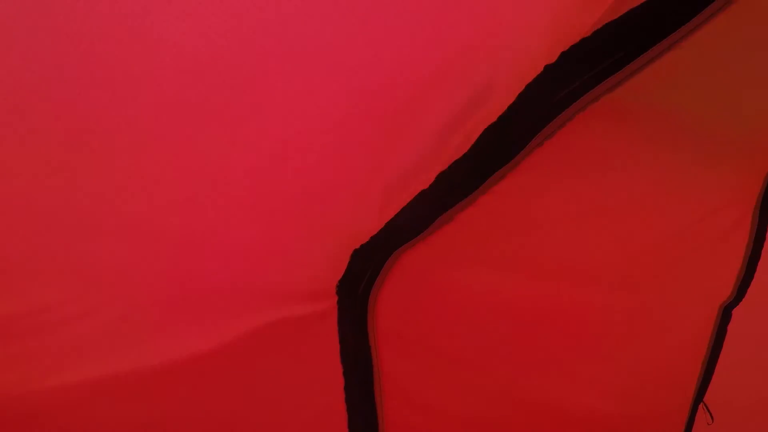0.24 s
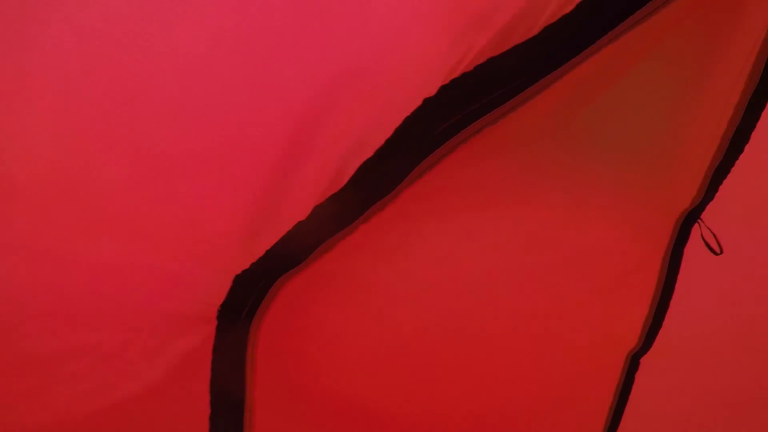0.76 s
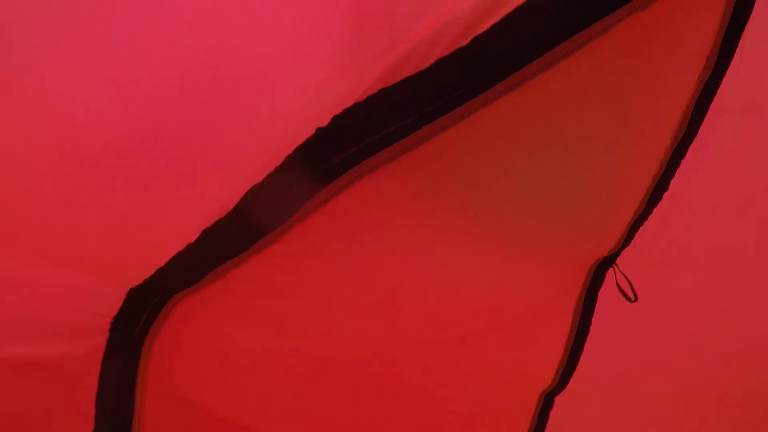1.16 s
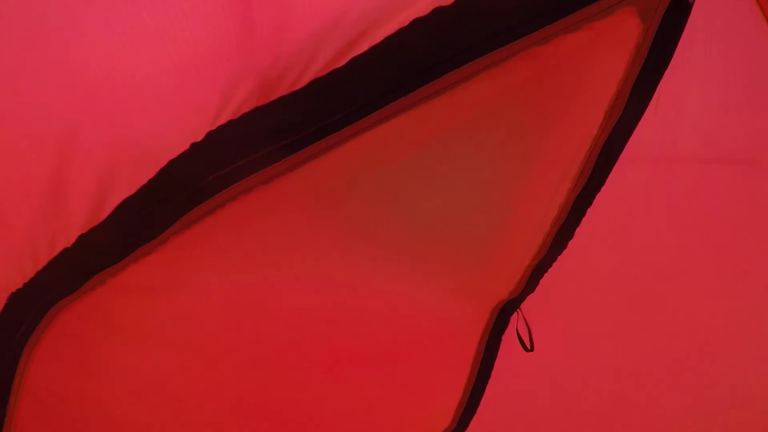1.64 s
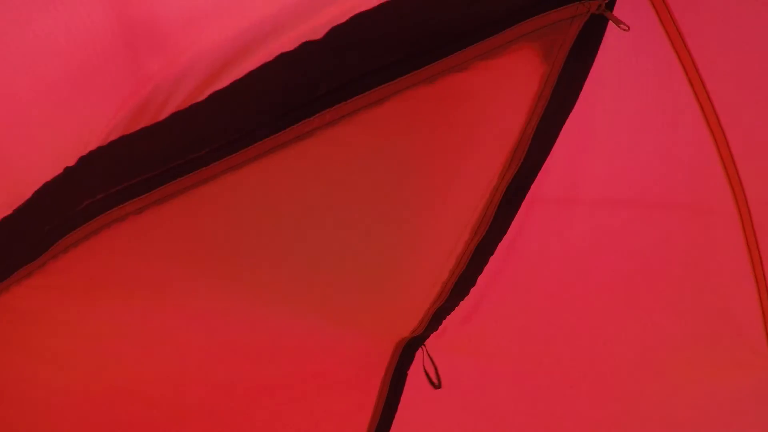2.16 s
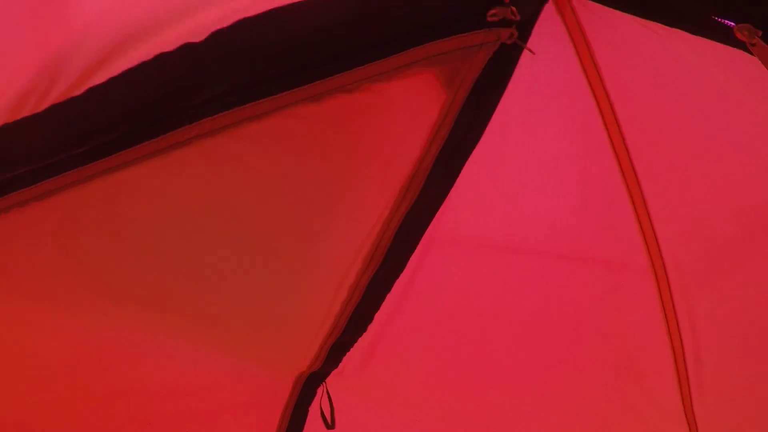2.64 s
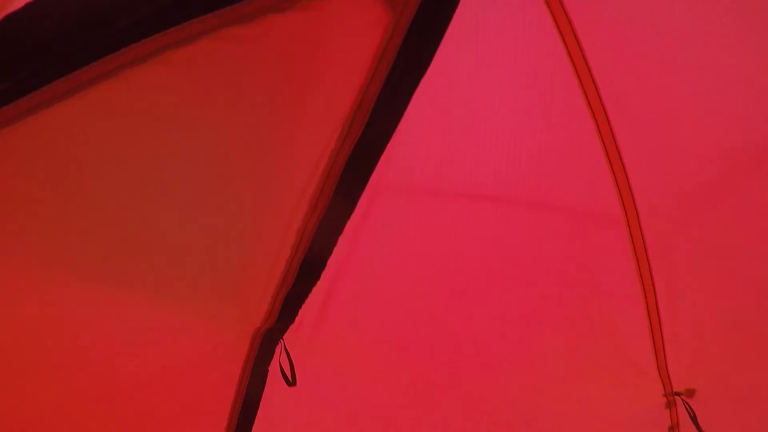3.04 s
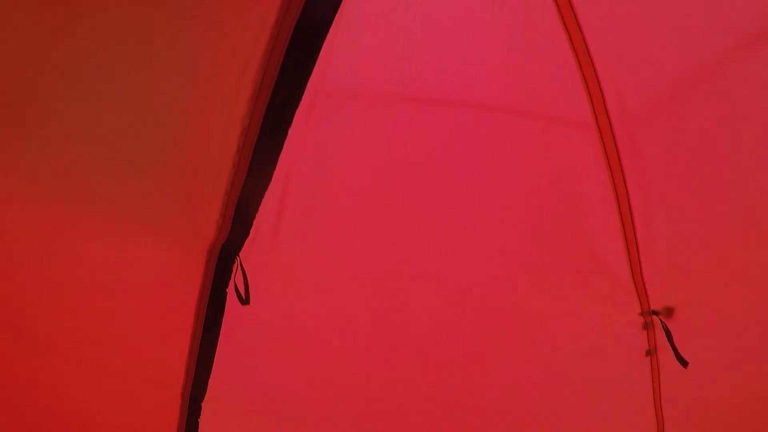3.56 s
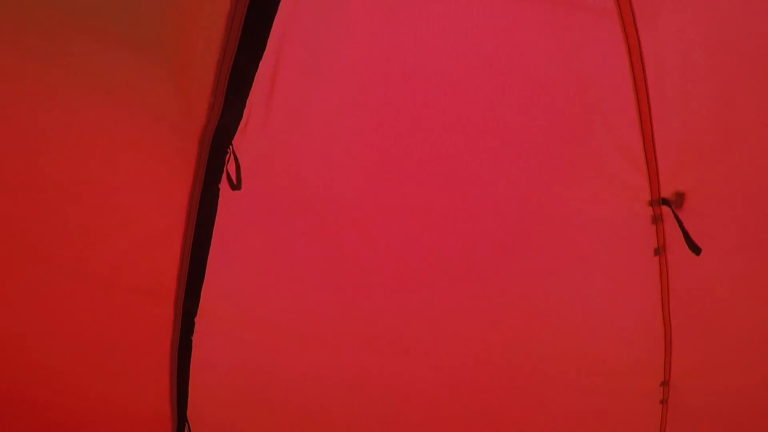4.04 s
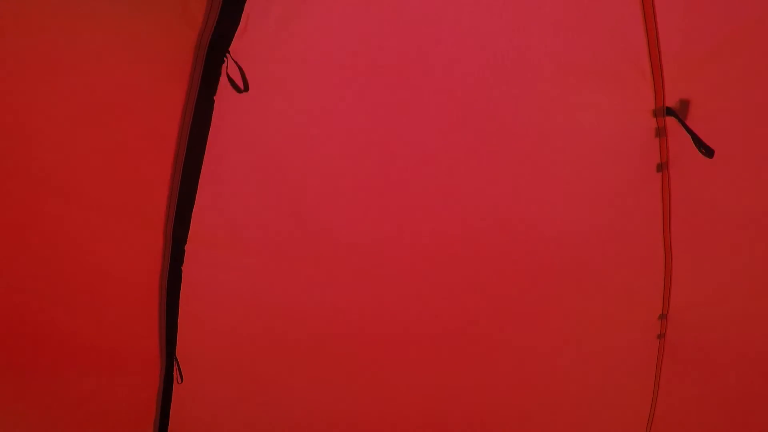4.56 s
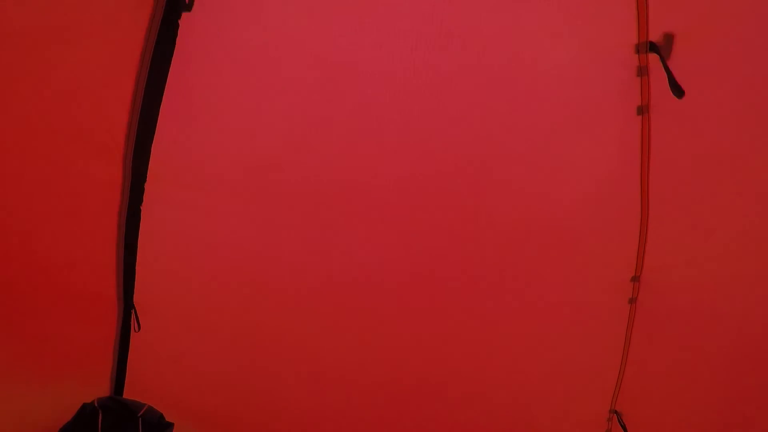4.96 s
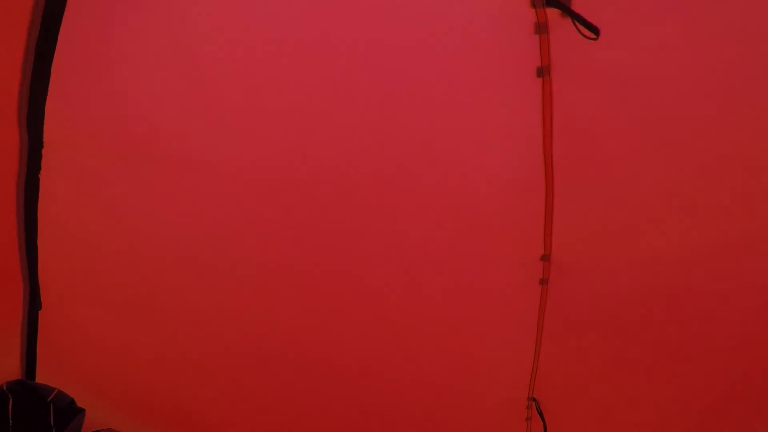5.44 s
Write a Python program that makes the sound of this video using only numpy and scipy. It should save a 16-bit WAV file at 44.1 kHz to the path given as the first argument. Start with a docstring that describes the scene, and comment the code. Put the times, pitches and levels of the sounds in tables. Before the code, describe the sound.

A close, dry mono sound from inside a tent in a storm. Very deep wind pressure, mostly below 100 Hz, pumps the walls in irregular lumps throughout, far louder than the muffled roar and fine fabric hiss above it. The first second is the windiest, with crisp cloth snaps at about 0.1 and 0.5 s and dull knocks at 0.2, 0.3, 0.5 and 0.65. A strong buffet and a knock come around 1.35 s. From 1.5 to 2.8 s the wind is somewhat lower, with scattered rustles and a knock at 2.15. Gusts swell near 3.05; a tight, bright cluster of slaps hits at 3.55. It eases around 4.1 to 4.6, with tiny zip-pull tinkles near 4.25 to 4.4. The pressure surges at 4.97, a heavy hard flap strikes at 5.16, and the biggest bass buffet, overloading, comes at 5.3. Crackling flaps follow at 5.5 to 5.6, and it stops mid-wind. Faint high metallic ticks recur throughout.

```python
"""Inside a tent in a storm. Gusts pump the walls with deep pressure lumps, roar over the fly sheet and hiss along it:
filtered noise under slow gain curves. The cloth rustles, snaps taut in bursts of crackle and knocks in short
damped swings; two small metal zip pulls jingle as sums of decaying modes. The loudest peaks overload the microphone."""
import sys
import numpy as np
from scipy import signal
from scipy.fft import rfft, irfft, next_fast_len
from scipy.io import wavfile
from scipy.ndimage import uniform_filter1d, map_coordinates

SR = 44100
rng = np.random.default_rng(int(sys.argv[2]) if len(sys.argv) > 2 else 0)


def master_out(mix):
    """Clip the mix to full scale and print it as 16-bit PCM to the path in sys.argv[1]."""
    frames = np.transpose(np.atleast_2d(mix))
    ceiling = np.clip(frames, -1, 1)
    pcm = np.round(ceiling * 32767).astype(np.int16)
    wavfile.write(sys.argv[1], SR, pcm)


N = 250929

# Pumping of the walls by gusts: t/s, nominal level/dB
WALL_LUMPS = [(0.0, -8), (0.4, -8), (0.7, -8.5), (0.74, -10.5), (0.95, -9.5), (1.17, -9.5), (1.25, -16.5),
              (1.37, -5.5), (1.54, -15.5), (1.6, -8.5), (1.68, -22), (1.73, -11.5), (1.9, -10.5),
              (2.15, -12.5), (2.22, -19.5), (2.42, -12.5), (2.83, -13), (3.05, -7), (3.28, -12),
              (3.6, -11.5), (3.76, -16), (3.81, -9), (4.06, -23), (4.1, -13.5), (4.6, -16), (4.89, -13),
              (4.97, -7), (5.02, -19), (5.24, -14), (5.32, 0), (5.6, -16.5), (5.66, -8)]
# Wind along the fly sheet: t/s, nominal roar level/dB, nominal fine hiss level/dB
WIND_LEVELS = [(0.04, -19, -49.5), (0.2, -23, -49), (0.5, -18.5, -45.5), (0.7, -23, -48.5), (0.9, -25, -51),
               (1.13, -27.5, -53), (1.48, -27.5, -60.5), (1.73, -29.5, -53.5), (1.88, -26.5, -50),
               (2.25, -27.5, -52.5), (2.45, -22, -48.5), (2.68, -29, -55), (2.9, -23, -51),
               (3.05, -24, -47), (3.5, -24.5, -53), (3.75, -26, -53), (4.05, -29, -53.5),
               (4.25, -28.5, -53.5), (4.55, -29.5, -56), (4.81, -25.5, -52.5), (5.21, -27, -48),
               (5.38, -24, -48), (5.66, -27.5, -52.5)]
# Relative spectral densities of the four layers of air noise: f/Hz, level/dB
PUMP_SPECTRUM = [(7.1, -62), (12, 2), (27, 1), (42, 0), (68, -4), (136, -19), (200, -24.5), (260, -27),
                 (440, -120)]
ROAR_SPECTRUM = [(59, -58), (100, -3.5), (420, -15), (755, -17), (1110, -21.5), (1450, -26), (1840, -39),
                 (2400, -40.5), (3120, -64), (5280, -120)]
HISS_SPECTRUM = [(880, -15), (1500, -10), (1740, -5), (2250, -13.5), (2790, -5.5), (4230, -11.5),
                 (4970, -6.5), (6600, -24.5), (7500, -22), (9750, -34), (16500, -120)]
FINE_SPECTRUM = [(3530, -33), (6000, -2), (6840, -9.5), (9480, -8), (10900, -12.5), (14400, -11.5),
                 (15500, -17)]
# Cloth snapping taut: peak t/s, slap level/dB, crispness level/dB re slap, e-fold rise time/s, nominal t60/s
CLOTH_SNAPS = [(0.113, -25.5, -8.5, 0.0023, 0.12), (0.298, -46, -2, .01, .03),
               (0.406, -29, -26, .0045, .037), (0.466, -29, -8, .0024, .06),
               (0.49, -21.5, -8, 0.0025, 0.08), (0.788, -27.5, -8.5, 0.0044, .035),
               (0.895, -34.5, -19, .003, .023), (1.17, -44, -4, .017, .08), (1.497, -35, -12, .002, 0.017),
               (1.656, -41, -7, .003, .13), (1.688, -39, -14, .008, .054), (1.769, -33.5, -8, .003, 0.13),
               (1.944, -31.5, -9, .003, 0.038), (2.301, -32, -26, .001, 0.062),
               (2.458, -28, -26, 0.0022, 0.07), (2.661, -31.5, -8, 0.0072, 0.057),
               (2.802, -35.5, -36, .001, 0.025), (2.904, -32, -12, .003, .063),
               (2.94, -35, -8, 0.0059, .127), (3.007, -27, -30, 0.0038, .03),
               (3.044, -35.5, -12, .003, .09), (3.163, -30.5, -7.5, .007, 0.055),
               (3.331, -35, -14, .003, .024), (3.404, -38.5, -2, .003, .08),
               (3.448, -34.5, -3.5, .004, 0.075), (3.564, -28.5, -4, .001, 0.11),
               (3.569, -27, -18, 0.011, .04), (3.684, -38.5, -22, .007, 0.13), (3.731, -34, -9, .005, .046),
               (3.923, -28, -4, .0027, 0.052), (4.084, -38, -14, .004, .12),
               (4.166, -32.5, -26, .003, .023), (4.231, -30.5, -8.5, 0.012, 0.13),
               (4.645, -31.5, -7, 0.0039, 0.035), (4.667, -30.5, -20, .004, .02),
               (4.774, -36, -21, .0024, .023), (4.941, -28, -9, 0.013, 0.033), (5.109, -42, -8, .006, .054),
               (5.166, -23.5, -7.5, .0023, 0.055), (5.266, -28, -24, 0.014, 0.064),
               (5.371, -35.5, -12, .025, 0.15), (5.528, -28.5, -9.5, .012, 0.058),
               (5.56, -25.5, -21, .0075, .04), (5.586, -36.5, -9, .02, .067)]
# Relative spectral densities of the three parts of a snap: f/Hz, level/dB
THUD_SPECTRUM = [(100, -34), (250, -1), (900, -10.5), (1500, -11), (2400, -44)]
SLAP_SPECTRUM = [(1200, -38), (2000, 8.5), (3500, 5), (5000, 6.5), (6000, 1.5), (8000, -34)]
CRISP_SPECTRUM = [(5000, -25), (7000, -2), (8500, 0), (11000, -7), (15500, -12)]
# Blows of slack cloth on pole or inner wall, and one short sharp click at 3.549 s: t/s, nominal peak level/dB,
# starting f/Hz, # decay to -60 dB [swings at the starting f]
CLOTH_KNOCKS = [(0.204, -11, 520, 18), (.2805, -11, 950, 19), (0.489, -12.5, 1480, 25),
                (.640, -13, 710, 14), (1.3372, -10.5, 1150, 12.5), (1.343, -15.5, 960, 28),
                (2.149, -15, 1195, 15), (3.5488, -8, 2600, 5.5), (3.5665, -9.5, 1350, 11),
                (3.5705, -11.5, 1160, 29), (3.920, -19, 1185, 36), (4.031, -23, 760, 13),
                (4.804, -13, 700, 12), (5.1628, 2.5, 464, 4), (5.163, -5.5, 1500, 8),
                (5.1661, -6.5, 245, 10), (5.525, -15, 614, 10)]
# Contacts of the long zip pull: nominal t/s, free ringing time/s, nominal level/dB, favoured mode [0-2, may be fractional]
LONG_PULL_CONTACTS = [(0.012, 0.029, -52, 1), (0.147, .01, -44, 0), (0.16, .032, -45, 1),
                      (0.171, .015, -46, 0.078), (0.241, .015, -48, .1), (0.321, .02, -45, 0.13),
                      (0.335, .028, -46, 1), (0.376, .025, -48, 1), (0.455, .03, -38, .9),
                      (0.467, .012, -44, 0), (0.504, .065, -34, 0.52), (0.545, .015, -40, 0),
                      (0.576, .015, -43, 0.18), (0.594, .012, -43, 0.11), (0.58, .075, -45, 1),
                      (0.84, .02, -39, .2), (0.86, .03, -40, 0.21), (0.905, .04, -50, 1),
                      (1.149, .08, -47, 1), (1.384, .03, -47, 1), (1.414, .018, -42, 1.4),
                      (1.454, .062, -41.5, 0.27), (1.536, .022, -39, 0.6), (1.835, .032, -36, 1.8),
                      (1.868, .03, -36, 2), (1.975, .062, -39.5, 1.25), (2.16, 0.045, -44, 1),
                      (2.203, .055, -44, 1), (2.539, .052, -40, 0.57), (2.985, .015, -50, .2),
                      (3.404, 0.094, -40, 1.3), (3.497, .022, -34, 1.8), (3.517, .025, -47, 0),
                      (3.651, .067, -45, 1.5), (4.382, .025, -48, 2), (4.412, .07, -45.5, 1),
                      (4.504, .017, -55, 0), (4.761, .047, -53, .2), (4.809, .012, -41, .6),
                      (4.868, .027, -47, 0), (4.878, .015, -40, 2), (4.978, .03, -49, 1),
                      (4.896, 0.034, -39, 1.6), (5.327, .02, -49, 2), (5.367, .062, -41, 2),
                      (5.452, .032, -46, 1.7), (5.509, .015, -43, 1), (5.552, .03, -48, 0)]
# Contacts of the short zip pull: nominal t/s, nominal level/dB, favoured mode [0-1, may be fractional]
SHORT_PULL_CONTACTS = [(0.147, -58, 1), (2.938, -46, .6), (3.374, -48, .6), (4.237, -33, .2),
                       (4.295, -37, .3), (4.359, -39, 0), (4.38, -45, 0), (4.896, -52, .1), (5.075, -50, 1),
                       (5.09, -45, .2), (5.125, -43, .3), (5.312, -47, .4), (5.652, -34, 0.06)]
# Modes of either pull: mean f/Hz, relative level/dB, free t60/s, standard deviation of f [share of f]
LONG_PULL_MODES = [(7440, 0, 0.064, 0.0043), (9200, -8, 0.46, 0.0012), (11430, -10, 0.2, .0015)]
SHORT_PULL_MODES = [(5960, -0.5, 0.027, .006), (14250, -7, .06, .004)]
# Relative spectral density of the tick of metal contact: f/Hz, level/dB
TICK_SPECTRUM = [(5500, -30), (7000, 6), (9500, -4), (12500, -13), (15500, -20)]

LUMP_KNOTS_PER_S, LUMP_SWING_DB = 14, 1.5  # uneven buffets: rate and depth
# mean nominal hiss level; shares of the roar's and fine hiss's level swings that it follows
HISS_MEAN_DB, HISS_FROM_ROAR, HISS_FROM_FINE = -41.5, .3, 0.33
THUD_RE_SLAP_DB = 6
MODE_FALL_DB = 15  # loss per mode away from the favoured one
LIGHT_MIN_DB, LIGHT_MEAN_FREE_S = -54.5, .025  # light random touches of the long pull
TOP_HZ = 15300  # upper band limit


def pumping():
    """Wall displacement by turbulent pressure: low-band noise, saturating as the cloth tension rises."""
    level_db = curves(WALL_LUMPS)[0] + LUMP_SWING_DB * wobble(LUMP_KNOTS_PER_S)
    swing = amp(level_db) * rush(PUMP_SPECTRUM, patchy_db=-0.04)
    # the taut walls resist the largest swings
    return swing / (1 + (swing / .95) ** 4) ** (1 / 4)


def wind():
    """Broadband turbulence noise in three bands, amplitude-modulated by flutter and small folds of cloth."""
    roar_db, fine_db = curves(WIND_LEVELS)
    roar_swing_db, fine_swing_db = roar_db - roar_db.mean(), fine_db - fine_db.mean()
    hiss_db = HISS_MEAN_DB + HISS_FROM_ROAR * roar_swing_db + HISS_FROM_FINE * fine_swing_db
    flutter = wobble(13)
    wide = rustle(count=170, spread_db=5, t60=0.074)
    narrow = rustle(count=170, spread_db=4, t60=0.045)

    roar_gain = amp(roar_db + .5 * flutter) * (1.102 + 0.17 * narrow)
    hiss_gain = amp(hiss_db + 0.1 * flutter) * (0.79 + 0.31 * wide)
    fine_gain = amp(fine_db + 0.49 * flutter) * (0.68 + 0.13 * wide + 0.34 * narrow)
    roar = roar_gain * rush(ROAR_SPECTRUM, patchy_db=1.03)
    hiss = hiss_gain * rush(HISS_SPECTRUM, patchy_db=1.65)
    fine = fine_gain * rush(FINE_SPECTRUM, patchy_db=1.2)
    return roar + hiss + fine


def rustle(count, spread_db, t60):
    """Superposition of energy: random small folds, each a quick rise and short decay, form a gain curve of rms 1."""
    where, size = rng.random(count), rng.standard_normal(count)
    energy = amp(spread_db * np.tanh(size / 2) * 2) ** 2
    folds = np.bincount((where * N).astype(int), energy, N)
    t = np.arange(SR // 10) / SR
    # -120 dB in energy becomes -60 dB after the square root
    fold_shape = amp(-120 * t / t60) * (1 - np.exp(-t / 0.0097))
    return unit(np.sqrt(np.abs(signal.fftconvolve(folds, fold_shape)[:N])))


def snaps():
    """Sudden release of tension: uneven crackle swells exponentially as the fold runs out, then dies."""
    lead = SR // 20  # samples kept ahead of each peak
    out, t = np.zeros(N + SR), (np.arange(SR // 5) - lead) / SR
    for s, db, crisp_db, rise, t60 in CLOTH_SNAPS:
        unevenness = uniform_filter1d(rng.standard_normal(len(t)), size=40) * np.sqrt(40)
        creases = amp(3.16 * unevenness)
        # spectrum, level re slap, multiple of the nominal t60
        parts = (THUD_SPECTRUM, THUD_RE_SLAP_DB, 1.1), (SLAP_SPECTRUM, 0, 1), (CRISP_SPECTRUM, crisp_db, .9)
        for spectrum, part_db, life in parts:
            shape = np.where(t < 0, np.exp(t / rise), amp(-60 * t / (life * t60)))
            crackle = unit(coloured(rng.standard_normal(len(t)) * creases, spectrum))
            out[round(s * SR):][:len(t)] += amp(db + part_db) * shape * crackle
    return out[lead:N + lead]


def knocks():
    """Heavily damped oscillation, rough with slap noise; the pitch sags as the cloth slackens."""
    out, t = np.zeros(N + SR), np.arange(SR // 20) / SR
    for s, db, hz, swings in CLOTH_KNOCKS:
        cycles = hz * t * (1 - 12 * t) + 0.015 * rng.standard_normal()
        swing = np.sin(2 * np.pi * cycles)
        slap_spectrum = [(hz / 3, -20), (hz / 1.8, 0), (hz * 1.4, -3), (hz * 4, -25)]
        slap = unit(coloured(rng.standard_normal(len(t)), slap_spectrum))
        shape = amp(db - 60 * t * hz / swings) * (1 - np.exp(-t / 0.00017))
        out[round(s * SR):][:len(t)] += shape * (swing + 0.51 * slap)
    return out[:N]


def jingle(contacts, modes, tick_db):
    """Modal vibration: a metal pull ticks, rings in modes, and is damped when it falls back."""
    out, t = np.zeros(N + SR), np.arange(SR // 6) / SR
    for s, free, db, favoured in contacts:
        damping = amp(-60 * np.maximum(t - free, 0) / .025)
        gate = (1 - np.exp(-t / 0.00049)) * damping
        levels = [db + own_db - MODE_FALL_DB * abs(k - favoured) for k, (_, own_db, *_) in enumerate(modes)]
        # the tick follows the level of the lowest mode
        tick = unit(coloured(rng.standard_normal(len(t)), TICK_SPECTRUM))
        sound = amp(levels[0] + tick_db - 60 * t / 0.016) * tick
        for level_db, (hz, _, t60, scatter) in zip(levels, modes):
            pitch = hz * (1 + scatter * rng.standard_normal())
            sound = sound + amp(level_db + 6.0 - 60 * t / t60) * gate * np.sin(2 * np.pi * pitch * t)
        start = max(round((s - .001) * SR), 0)  # 1 ms ahead of the nominal time
        out[start:][:len(t)] += sound
    return out[:N]


def touches(count):
    """Random excitation: light contacts of the long pull at uniformly random moments, each favouring one mode."""
    return [(a * N / SR, LIGHT_MEAN_FREE_S * (.5 + b), LIGHT_MIN_DB + 5 * c, round(2 * d))
            for a, b, c, d in rng.random((count, 4))]


def rush(spectrum, patchy_db):
    """Turbulence as filtered noise of rms 1, with patches of random gain in time and frequency."""
    z = signal.stft(rng.standard_normal(N + 512), nperseg=512)[2]
    field = uniform_filter1d(rng.standard_normal(z.shape), size=7, axis=0)  # smooth over frequency
    field = uniform_filter1d(field, size=8, axis=1)  # smooth over time
    patchy = signal.istft(z * amp(patchy_db * unit(field)), nperseg=512)[1][:N]
    return unit(coloured(patchy, spectrum))


def coloured(x, points):
    """Linear filtering: x through a (f/Hz, level/dB) spectrum interpolated on a log frequency axis."""
    m = next_fast_len(len(x) + 8192)
    f, db = np.transpose(points)
    log_f = np.log(np.fft.rfftfreq(m, 1 / SR) + 1)
    gain = amp(np.interp(log_f, np.log(f + 1), db, -120, -120))
    return irfft(rfft(x, m) * gain, m)[:len(x)]


def wobble(rate):
    """Slow random modulation: a smooth curve through normal random knots, rate knots a second."""
    return map_coordinates(rng.standard_normal(N // 100), [np.arange(N) * rate / SR])


def curves(rows):
    """Linear interpolation: one value per sample for each column after the time."""
    s, *columns = np.transpose(rows)
    return [np.interp(np.arange(N) / SR, s, column) for column in columns]


def amp(db):
    """Logarithmic level in dB to amplitude gain."""
    return 10 ** (np.asarray(db) / 20)


def unit(x):
    """Power normalisation: x scaled to rms 1."""
    return x / np.sqrt(np.mean(x ** 2) + 1e-20)


def scene():
    """Linear superposition of wind, cloth and zip pulls at one microphone."""
    long_pull = jingle(LONG_PULL_CONTACTS + touches(count=22), LONG_PULL_MODES, tick_db=8)
    # the short pull rings freely for 14 ms
    short_contacts = [(s, .014, db, favoured) for s, db, favoured in SHORT_PULL_CONTACTS]
    short_pull = jingle(short_contacts, SHORT_PULL_MODES, tick_db=-15)
    return (pumping() + wind() + snaps() + knocks() + long_pull + short_pull)[None]


def record(dry):
    """Saturation and band limiting: the input clips near full scale, then keeps nothing from TOP_HZ up."""
    clipped = dry / (1 + np.abs(dry) ** 12) ** (1 / 12)
    m = next_fast_len(N + 8192)
    passband = np.fft.rfftfreq(m, 1 / SR) < TOP_HZ
    return irfft(rfft(clipped, m) * passband, m)[:, :N]


dry = scene()
out = record(dry)
master_out(out)
```